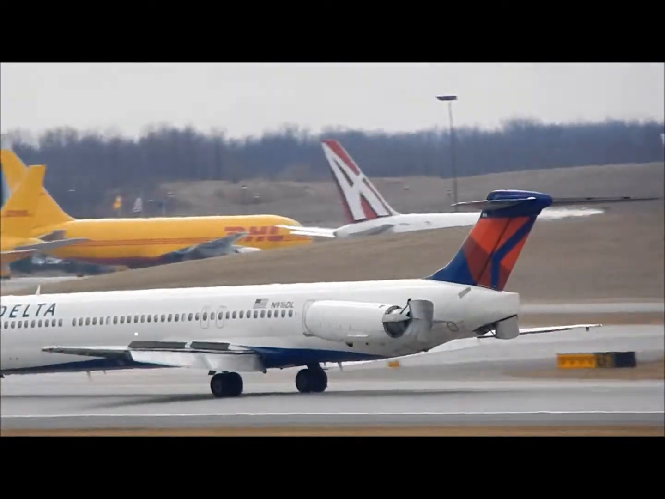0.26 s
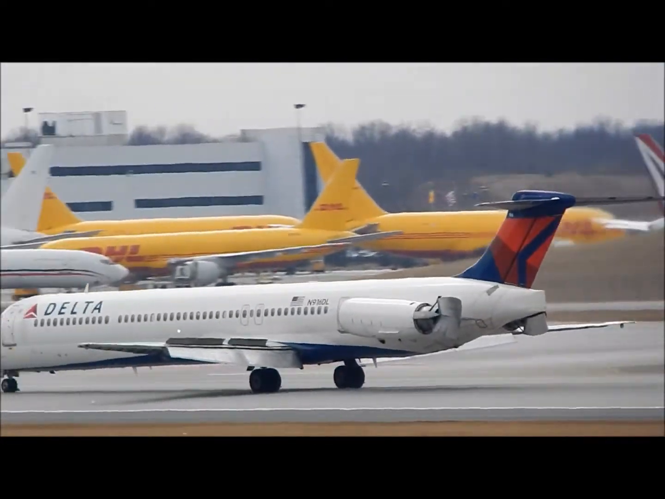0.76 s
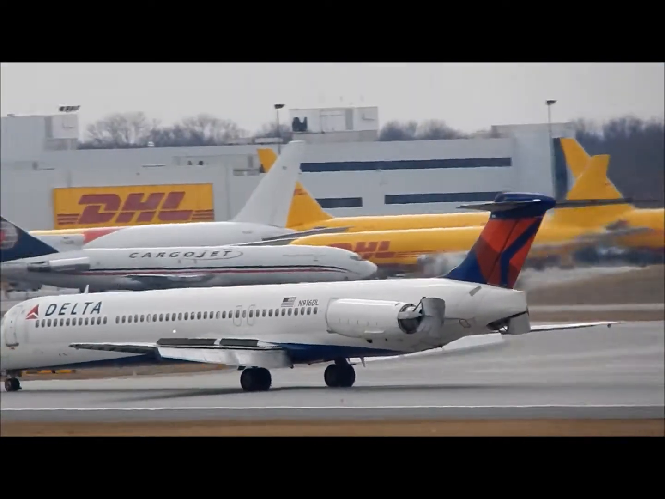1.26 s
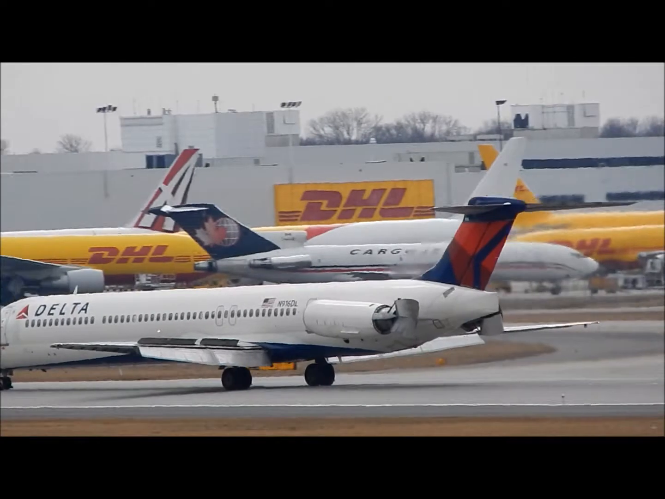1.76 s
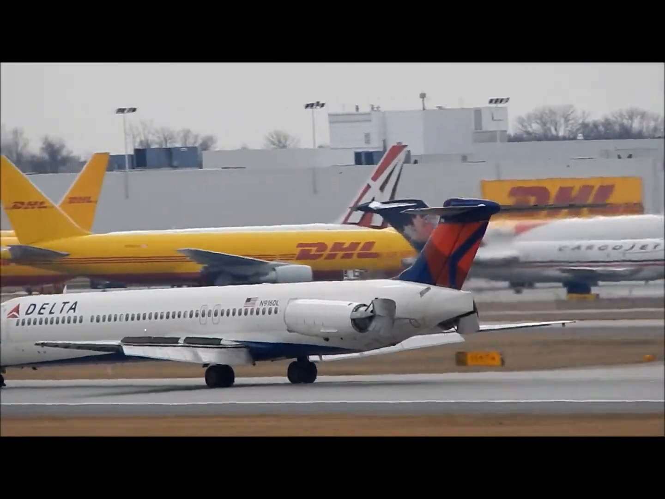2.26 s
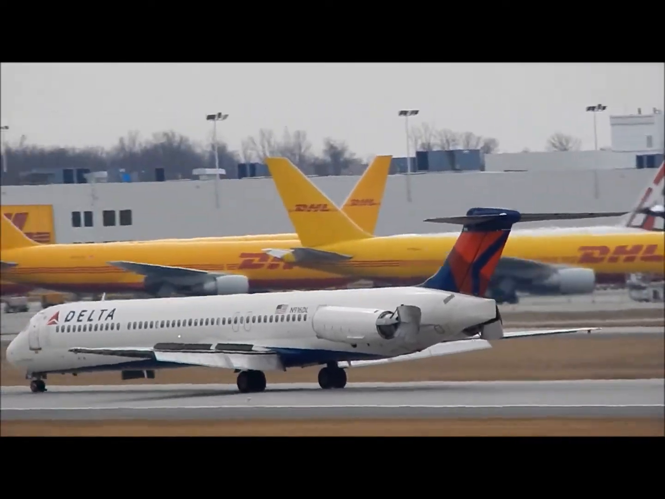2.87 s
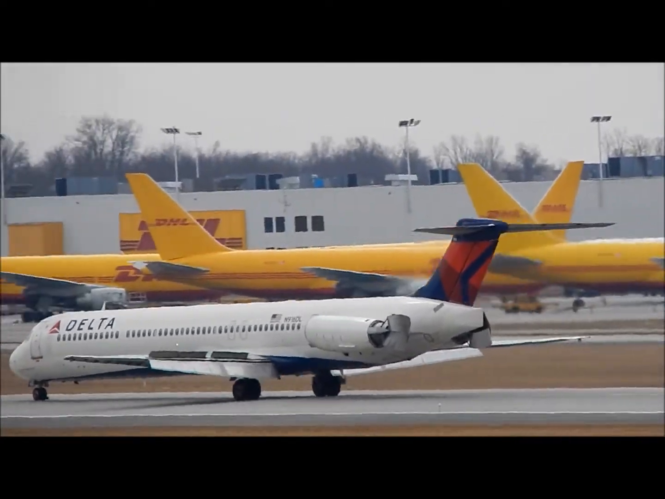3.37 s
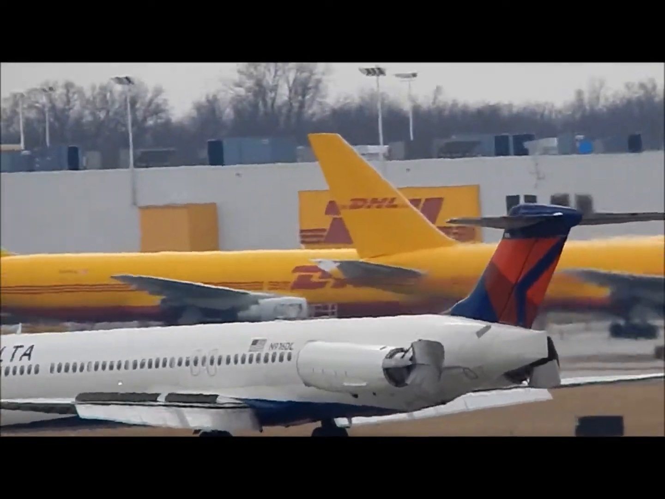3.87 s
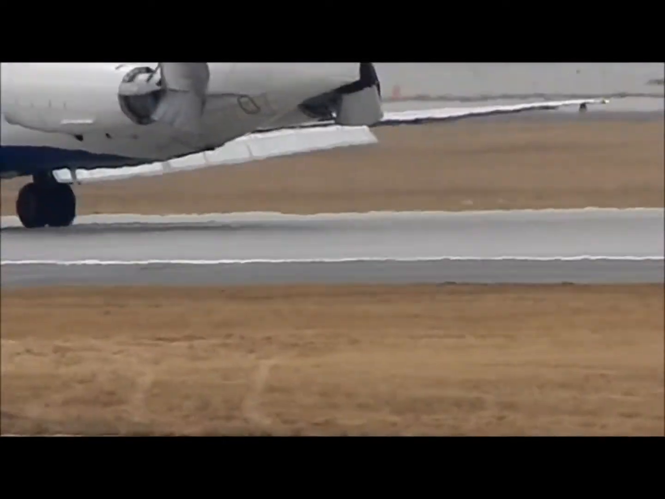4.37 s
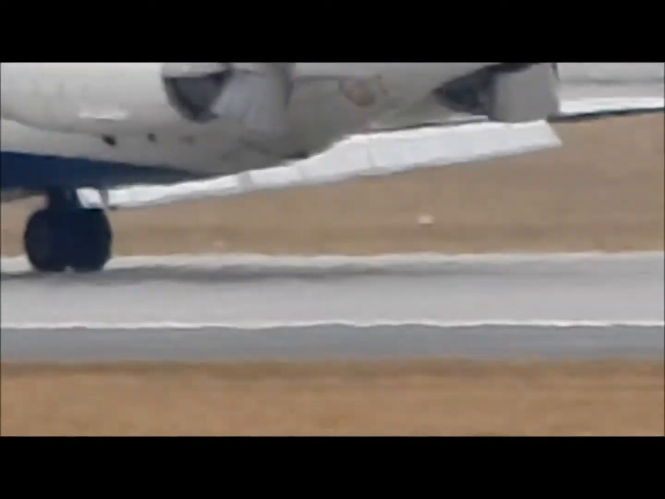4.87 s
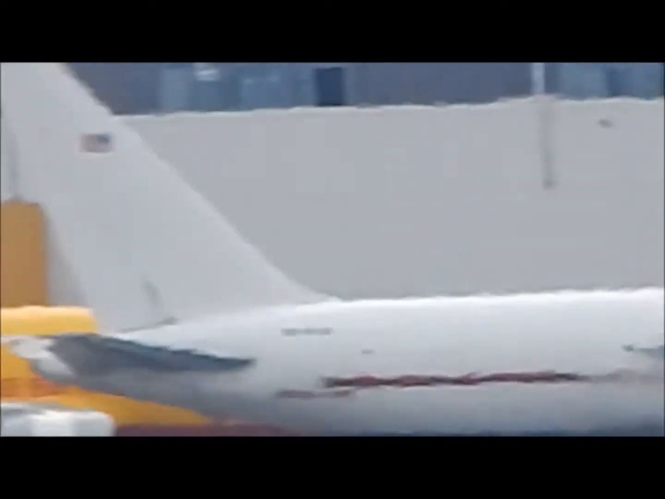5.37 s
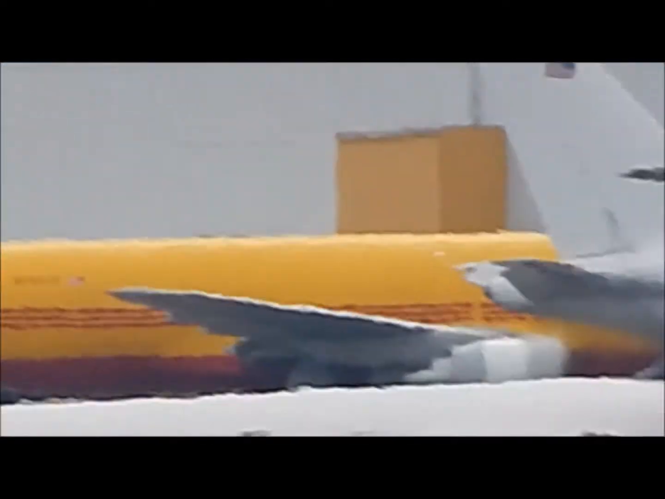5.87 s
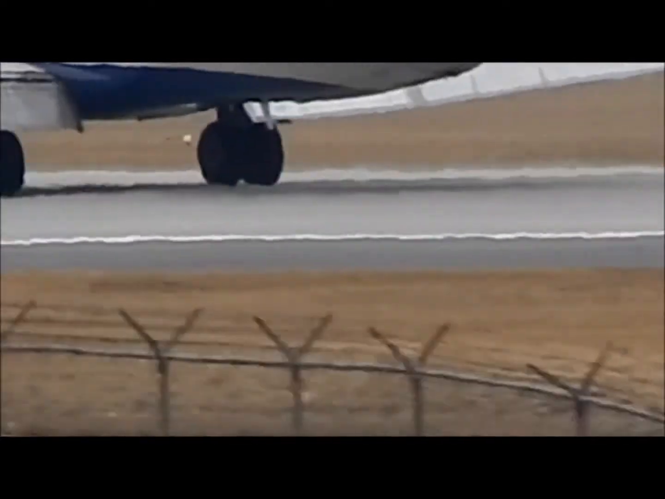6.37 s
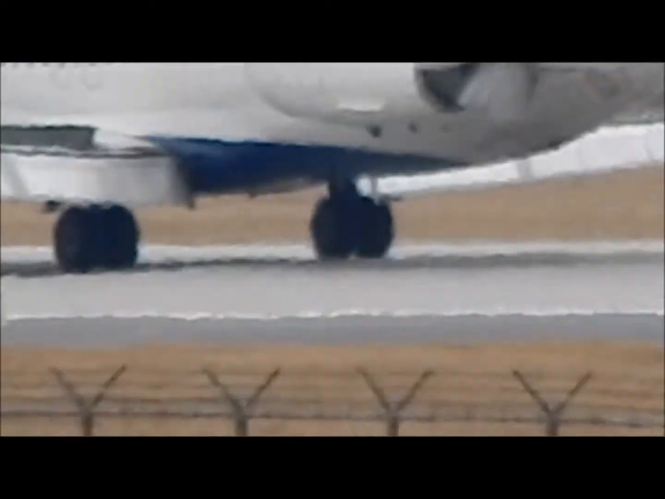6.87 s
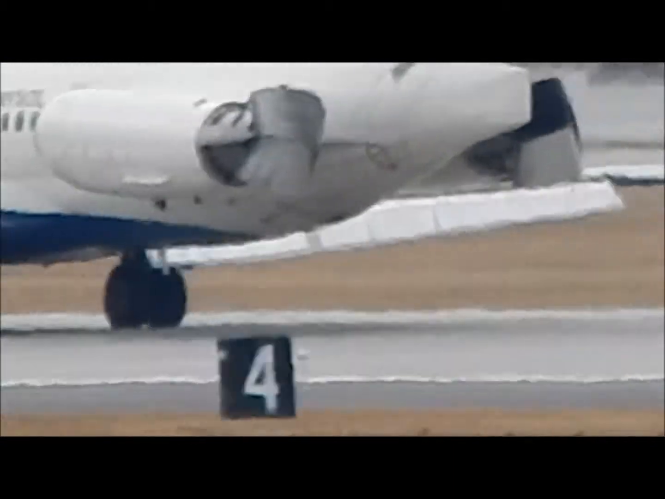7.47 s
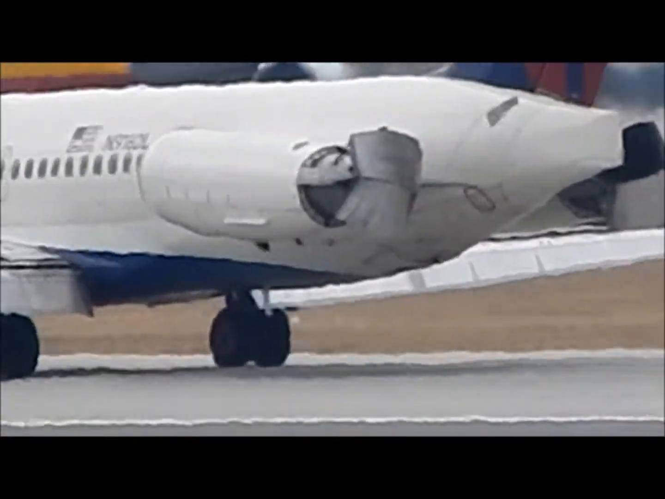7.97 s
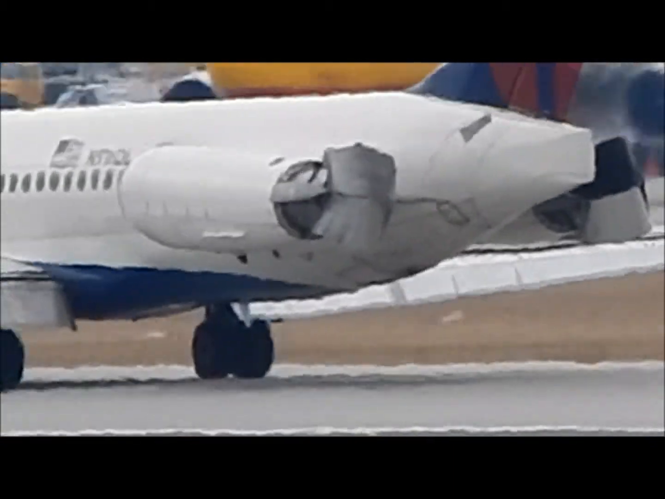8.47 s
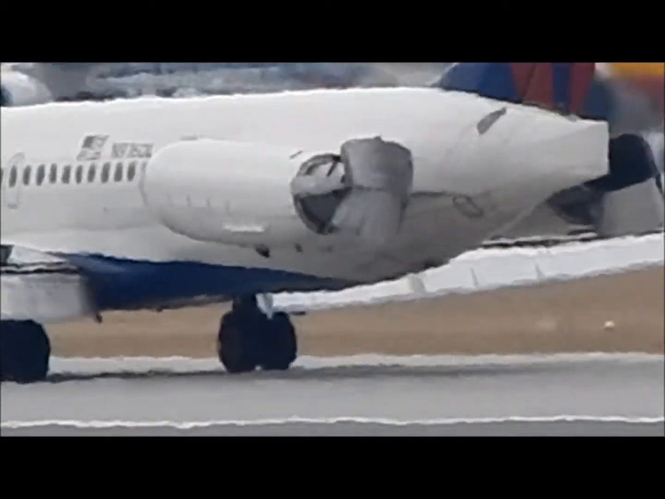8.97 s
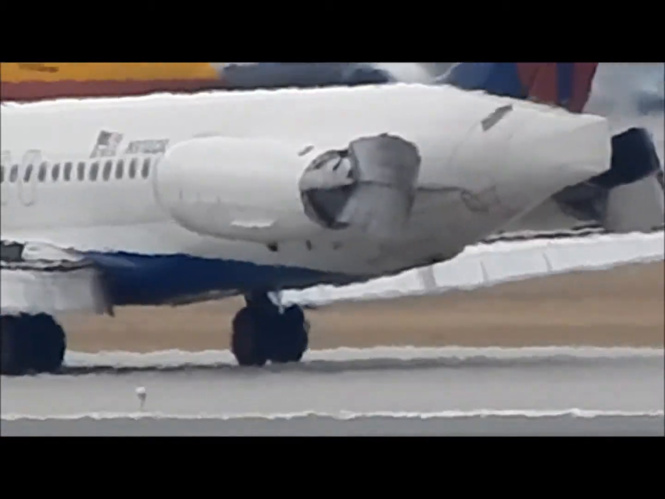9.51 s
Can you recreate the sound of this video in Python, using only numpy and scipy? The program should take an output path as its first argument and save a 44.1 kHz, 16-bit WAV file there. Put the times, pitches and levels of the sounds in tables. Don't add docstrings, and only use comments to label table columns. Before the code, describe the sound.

Distant twin jet braking in reverse thrust, a dull hollow roar, with wind booming on the microphone and fingers ticking on its casing.

```python
import sys
import numpy as np
from scipy import signal
from scipy.fft import rfft, irfft, next_fast_len
from scipy.io import wavfile
from scipy.ndimage import uniform_filter1d, map_coordinates

SR = 44100
rng = np.random.default_rng(int(sys.argv[2]) if len(sys.argv) > 2 else 0)


def gain_from_db(level_db):
    decades = np.asarray(level_db, float) / 20
    return 10 ** decades


def unload_wav(signal):
    wavfile.write(
        sys.argv[1],
        SR,
        np.round(np.clip(np.atleast_2d(signal).T, -1, 1) * 32767).astype(np.int16),
    )


N = 429521


def unit(x):
    return x / np.sqrt(np.mean(x ** 2) + 1e-20)


def along(points, hz):
    f, v = np.transpose(points)
    return np.interp(np.log(hz + 1), np.log(f + 1), v)


def curves(rows, t=None):
    s, *columns = np.transpose(rows)
    t = np.arange(N) / SR if t is None else t
    return [np.interp(t, s, column) for column in columns]


def wobble(knots_per_s):
    return map_coordinates(rng.standard_normal(1000), [np.arange(N) * knots_per_s / SR])


def filtered(x, response):
    m = next_fast_len(N + 8192)
    hz = np.fft.rfftfreq(m, 1 / SR)
    return irfft(rfft(x, m) * response(hz), m)[..., :N]


def band(x, low_hz, high_hz):
    return signal.lfilter(*signal.butter(2, [low_hz, high_hz], "bandpass", fs=SR), x)


def rush(spectrum, alike, patchy_db, moving_db=lambda hz, t: 0):
    hz, t, z = signal.stft(rng.standard_normal((2, N)), SR, nperseg=1024)
    patches = uniform_filter1d(rng.standard_normal(z.shape[1:]), size=8, axis=0)
    patches = unit(uniform_filter1d(patches, size=7, axis=1))
    z = z * gain_from_db(patchy_db * patches + along(spectrum, hz)[:, None])
    turn = np.arccos(np.clip(along(alike, hz), -1, 1))[:, None] / 2
    mid, side = z * [np.cos(turn), np.sin(turn)]
    pair = np.array([mid + side, mid - side])
    return signal.istft(pair * gain_from_db(moving_db(hz[:, None], t)), SR, nperseg=1024)[1][:, :N]


def panned(x, db):
    return x * gain_from_db(np.reshape([db / 2, -db / 2], (2, -1)))


# frequency in Hz, density in dB per Hz.
HISS_SPECTRUM = [(1500, -18.5), (3000, -1.5), (4000, -2.5), (5000, -6), (7000, -9.5), (10500, -8.5),
                 (13000, -11), (15800, -15.5)]
# start in seconds, frequency in Hz, level in dB.
LENS_MOTOR = (5.2, 11250, -83.5)


def hiss():
    t = np.arange(N) / SR
    start, hz, motor_db = LENS_MOTOR
    tone = (t > start) * np.sin(2 * np.pi * hz * t)
    whine = [[.2], [1]] * gain_from_db(motor_db + 3 * wobble(4)) * tone
    return gain_from_db(-62.5) * unit(rush(HISS_SPECTRUM, [(5000, 0.089)], .6)) + whine


# start in seconds, length in seconds, frequency in Hz, level in dB.
CREAKS = [
    (7.04, .11, 5000, -65),
    (7.042, 0.15, 8300, -65),
    (7.253, 0.033, 4000, -58),
    (8.1, .05, 11300, -65),
]


def creaks():
    out = np.zeros((2, N))
    for s, length, hz, db in CREAKS:
        size = round(length * SR)
        noise = band(rng.standard_normal((2, size)), .93 * hz, 1.07 * hz)
        out[:, round(s * SR):][:, :size] += gain_from_db(db) * np.hanning(size) ** .5 * unit(noise)
    return out


# peak time in seconds, rise in seconds, peak level in dB,
# left-right difference in dB, dull part relative to the bright in dB.
STROKES = [(.23, 0.035, -65, -0.5, -3), (.48, .15, -70, 3, -3.5), (.91, 0.18, -65, 8.5, -4.5),
           (1.25, .15, -63.5, 4, -7.5), (1.61, 0.066, -62, 7.5, -8.5), (1.8, 0.91, -67.5, 4.5, -2.5),
           (2.78, 0.25, -63, -2, -6.5), (3.03, .25, -63.5, -1, -4), (3.2, .04, -54.5, -2, 1.5),
           (3.55, 0.065, -69.5, 6.5, -3), (3.87, .3, -67, 8, 0), (4.42, 0.2, -67.5, 5, 1.5),
           (4.71, .12, -59, 5.5, 0.5), (5.14, 0.016, -59.5, 3, -10), (5.4, .2, -68.5, 6.5, -2.5),
           (5.85, .7, -71, 2.5, -9.5), (6.41, 0.036, -70, -3, 1.5), (6.54, 0.13, -67.5, 8.5, -11),
           (7.29, .25, -64.5, 4.5, -1), (7.67, 0.17, -68.5, 7, -8), (7.8, 0.072, -54, 6.5, -3.5),
           (8.1, 0.71, -67.5, 8.5, -2), (9.35, .05, -68.5, -3, -5), (9.49, 0.074, -65, 2.5, -2)]
# frequency in Hz, density in dB per Hz.
SKIN_SPECTRUM = [(5500, -30), (7000, -6), (8500, -5), (11000, -3), (13500, -6), (15800, -13)]
# frequency in Hz, density in dB per Hz.
CLOTH_SPECTRUM = [(2500, -28.5), (4000, 0), (5000, -7), (6500, -6.5), (8000, -25.5), (9000, -59.5)]


def rub():
    s, rise, db, pan, dull_db = np.transpose(STROKES)[:, :, None]
    rise_db, release_ratio, rest_db = 10.5, 0.65, -83.5
    t = np.arange(N // 128 + 1) * 128 / SR
    stroke_db = db - rise_db * np.maximum((s - t) / rise, (t - s) / (release_ratio * rise))

    def level(relative_db):
        power = [np.sum(gain_from_db(stroke_db + relative_db + side * pan) ** 2, axis=0) + gain_from_db(rest_db) ** 2
                 for side in (.5, -.5)]
        return np.sqrt(power).repeat(128, axis=1)[:, :N]

    slips = np.minimum(rng.exponential(size=N // 128 + 1), 3)
    grains = gain_from_db(2.2 * slips).repeat(128)[:N]
    skin = level(2.0) * unit(grains * rush(SKIN_SPECTRUM, [(5000, 0.23)], 2.7))
    cloth = level(dull_db + 0.5) * unit(grains * rush(CLOTH_SPECTRUM, [(5000, .6)], 4.0))
    return skin + cloth


def crackle():
    faint_db, spread_db, bright_db = -59, 2.5, -1
    snaps = []
    for (s, rise, _, pan, _), (a, b, c) in zip(STROKES, rng.standard_normal((len(STROKES), 3))):
        snaps.append((s + .5 * rise * a, faint_db + spread_db * b, pan, faint_db + bright_db + spread_db * c))
    return snaps


# time in seconds, dull peak in dB, left-right difference in dB, bright peak in dB.
TICKS = [(0.2234, -40, -8.5, -54.5), (0.3945, -50, -0.5, -71), (0.4693, -44, -7, -57),
         (0.8894, -40, -1, -46.5), (1.0498, -46.5, -9, -62), (1.333, -39, -1.5, -54.5),
         (1.5904, -49.5, 5.5, -50.5), (1.8982, -52.5, 9, -52), (2.3147, -39, 6.5, -65.5),
         (3.1948, -41, -9, -52), (3.2037, -53, -0.5, -55), (3.2214, -50, 2, -54), (3.3548, -41.5, 1, -61.5),
         (3.712, -43, -4, -55.5), (3.883, -57.5, 4, -55.5), (4.0474, -43.5, 2.5, -53),
         (4.4167, -39.5, 1, -58.5), (4.6163, -45, 3.5, -61), (4.6693, -55.5, 0, -45),
         (4.7118, -40.5, 8.5, -49.5), (4.7835, -22.5, -5.5, -35), (4.7883, -25.5, -4, -28),
         (6.4108, -43, -5, -64), (7.2946, -41, 4, -66), (7.7672, -53, -3, -55), (7.7974, -47, 4, -42.5),
         (7.882, -56, 3, -51), (9.5272, -50, -6, -71), (9.5935, -51.5, -2, -70), (9.654, -45, -10.5, -62.5)]
# frequency in Hz, level in dB, decay by 60 dB in seconds.
SHELL_MODES = [(2070, -1, .03), (3240, -3, 0.019), (7200, -8, 0.015), (9200, -8.5, .01)]


def fingers():
    out, t = np.zeros((2, N + SR)), np.arange(SR // 10) / SR
    for s, dull_db, pan, bright_db in TICKS + crackle():
        snap = (t == 0) + 0.21 * gain_from_db(-60 * t / 0.002) * rng.standard_normal((2, len(t)))
        dull = gain_from_db(dull_db + 16.5) * band(snap, 1200, 7500)
        bright = gain_from_db(bright_db + 25.0) * band(band(snap, 7000, 11000), 5400, 13500)
        ring = 0
        for hz, level_db, t60 in SHELL_MODES:
            ring = ring + gain_from_db(level_db + rng.normal(0, 3) - 60 * t / t60) * np.sin(2 * np.pi * hz * t)
        tick = dull + bright + gain_from_db(dull_db - 19.0) * ring
        out[:, round((s + .001) * SR):][:, :len(t)] += panned(tick, pan)
    return out[:, :N]


# time in seconds, level in dB.
SCRAPE_LEVEL = [
    (4.758, -92),
    (4.765, -41),
    (4.78, -32),
    (4.787, -24),
    (4.794, -36),
    (4.81, -39),
    (4.82, -49.5),
    (4.826, -68.5),
    (4.84, -110),
]
# frequency in Hz, density in dB per Hz.
SCRAPE_SPECTRUM = [(1000, -25), (2500, 3.5), (4000, -1), (6000, -8), (7200, 0), (9300, -4.5), (12000, -6),
                   (13800, -10.5), (14200, -20.5), (15800, -20)]


def knock():
    scrape = gain_from_db(curves(SCRAPE_LEVEL)[0]) * unit(rush(SCRAPE_SPECTRUM, [(3000, 0.3), (9000, -0.3)], 1.4))
    t = np.clip(np.arange(N) / SR - 4.788, 0, None)
    ring = gain_from_db(-8.0 - 60 * t / 0.012) * np.sin(2 * np.pi * 2100 * t)
    return panned(scrape, -8.5) + panned(ring, -9)


# start in seconds, length in seconds, buffet level in dB.
GUSTS = [(0.0, 0.12, -18), (.2, 0.081, -16), (0.374, 0.25, -19.5), (.69, 0.04, -14.5),
         (0.785, 0.032, -16.5), (0.852, 0.15, -16.5), (1.304, 0.088, -21), (1.438, .2, -15.5),
         (1.752, 0.68, -16), (2.482, .1, -20.5), (2.84, 0.078, -17.5), (3, 0.19, -18.5),
         (3.264, 0.18, -16.5), (3.467, 0.092, -13.5), (3.588, 0.05, -17.5), (3.685, 0.27, -13.5),
         (3.94, .19, -17), (4.141, 0.32, -14), (4.482, 0.28, -16.5), (4.79, 0.33, -14.5),
         (5.17, 0.054, -11.5), (5.279, 0.44, -17.5), (5.758, 0.74, -17), (6.551, 0.35, -21),
         (6.95, .12, -19), (7.17, .44, -17.5), (7.695, .79, -20), (8.56, 0.039, -22), (8.972, 0.049, -23.5),
         (9.09, 0.024, -18.5)]
# frequency in Hz, density in dB per Hz.
BUFFET_SPECTRUM = [(12, -57), (20, -27), (43, -18.5), (76, -3.5), (97, 2), (127, -3), (227, -33),
                   (270, -37.5), (350, -56), (590, -120)]
# frequency in Hz, left-right likeness from 0 to 1.
BUFFET_ALIKE = [(35, .45), (70, .94), (250, .92)]


def wind():
    swell_db_per_s = 1.5
    lulls_per_s, lull_below, lull_db = 30, -1.0, -15
    noise = unit(filtered(rush([(20, 0)], BUFFET_ALIKE, 0), lambda hz: gain_from_db(along(BUFFET_SPECTRUM, hz))))
    power = np.abs(uniform_filter1d(np.mean(noise ** 2, axis=0), size=2000))
    lumpy = gain_from_db(1.1 * wobble(25)) * noise / (0.34 + power ** 0.15)
    lumpy = lumpy * gain_from_db(lull_db * np.clip(3 * (lull_below - wobble(lulls_per_s)), 0, 1))
    gate = np.zeros(N)
    for s, length, db in GUSTS:
        span = slice(max(round(s * SR), 0), round((s + length) * SR))
        crown = np.sin(np.linspace(0, np.pi, span.stop - span.start))
        gate[span] = gain_from_db(db + 1.5 + swell_db_per_s * length * (crown - 0.73)) / np.std(lumpy[:, span])
    gate = signal.fftconvolve(gate, np.hanning(500) / 250, "same")
    return filtered(gate * lumpy, lambda hz: hz ** 2 / (hz ** 2 + 30 ** 2))


# frequency in Hz, density in dB per Hz.
RUMBLE_SPECTRUM = [(15, -64.5), (40, -25.5), (80, -2), (115, 3), (160, -10.5), (220, -13.5), (300, -32),
                   (400, -77.5)]


def rumble():
    return gain_from_db(curves(JET_LEVEL)[0] - 10 + wobble(5.2)) * unit(rush(RUMBLE_SPECTRUM, [(100, .92)], 1.8))


# time in seconds, body level in dB, brightness of the upper humps in dB.
JET_LEVEL = [(0.0, -20, -0.5), (0.55, -20.5, 1), (1.35, -23, 7.5), (1.8, -21, 1), (2.4, -21, -1.5),
             (3.0, -18, -2), (3.3, -23.5, 0), (3.7, -22.5, -3), (4.5, -25, 1.5), (5.2, -20, -4.5),
             (6.1, -23.5, 3.5), (6.65, -21.5, -1.5), (7.1, -24.5, 4.5), (7.6, -22, -3.5), (8.3, -23, 2.5),
             (8.6, -26, -0.5), (9.4, -28, -2.5), (9.74, -36, 2.5)]
# frequency in Hz, density in dB per Hz.
ROAR_SPECTRUM = [(150, -38), (255, -36), (290, -21), (355, -2.5), (423, 1), (760, -3.5), (1050, -13.5),
                 (1380, -7.5), (1850, -19.5), (2280, -20), (2780, -33.5), (3400, -39.5), (3800, -51),
                 (7000, -79)]
ROAR_BANDS_HZ = [320, 440, 760, 1350, 2300, 3300]
BRIGHT_SHARE = [-0.7, 0.16, 1.16, 0.45, 0.7, .65]
AIR_LOSS_DB_PER_S = [.1, -0.1, -0.1, -0.13, 0.54, 0.99]
# time in seconds, frequency in Hz.
GROUND_DIP = [(0, 1063), (2, 1090), (3.2, 1037), (4.5, 1026), (6, 1044), (7.5, 1000), (8.5, 930),
              (9.74, 977)]
# frequency in Hz, left-right likeness from 0 to 1.
ROAR_ALIKE = [(280, 0.97), (610, 1), (1310, 0.98), (2830, 0.9)]
# frequency in Hz, left-right difference in dB.
ROAR_BALANCE = [(130, 0.5), (280, 1.4), (610, 0), (1310, .5), (2830, -1.5)]


def jet():
    def colour(hz, t):
        place = np.interp(np.log(hz + 1), np.log(ROAR_BANDS_HZ), np.arange(6))
        bright_db = curves(JET_LEVEL, t)[1]
        tilt = 0
        for k in range(6):
            band_db = BRIGHT_SHARE[k] * bright_db - AIR_LOSS_DB_PER_S[k] * (t - t.mean())
            tilt = tilt + np.clip(1 - abs(place - k), 0, 1) * band_db
        reach = np.interp(hz, [600, 850, 1900, 2300], [0, 1, 1, 0])
        moved_hz = hz * (1 + reach * (1050 / curves(GROUND_DIP, t)[0] - 1))
        return tilt + along(ROAR_SPECTRUM, moved_hz) - along(ROAR_SPECTRUM, hz)

    roar = rush(ROAR_SPECTRUM, ROAR_ALIKE, 1.24, colour)
    roar = roar / np.std(filtered(roar, lambda hz: (hz > 330) & (hz < 580)))
    side = np.array([[.5], [-.5]])
    lag = 2 / SR

    def ports(hz):
        return gain_from_db(along(ROAR_BALANCE, hz) * side) * np.exp(-2j * np.pi * hz * lag * side)

    return gain_from_db(curves(JET_LEVEL)[0] - 0.03 + 0.48 * wobble(9)) * filtered(roar, ports)


# time in seconds, depth in dB.
DUCKS = [
    (4.425, 2),
    (4.788, 13),
    (6.415, 1.5),
    (9.66, 1),
]


def duck(share, hold, db_per_s):
    t = np.arange(N) / SR
    lost_db = 0
    for s, db in DUCKS:
        attack = np.clip((t - s) / .02, 0, 1)
        recovered_db = db_per_s * np.clip(t - s - hold, 0, None)
        lost_db = lost_db + attack * np.clip(share * db - recovered_db, 0, None)
    return gain_from_db(-lost_db)


def scene():
    faint = duck(share=2.6, hold=.1, db_per_s=110) * (hiss() + rub())
    handling = creaks() + fingers() + knock()
    loud = duck(share=0.91, hold=0.14, db_per_s=21.3) * (wind() + rumble() + jet())
    return faint + handling + loud


def low_pass(x):
    return signal.sosfilt(signal.butter(12, 15830, fs=SR, output="sos"), x)


# frequency in Hz, width in Hz, depth from 0 to 1.
PORT_DIPS = [(2505, 45, .93), (3700, 45, .6), (7520, 50, .8)]


def record(dry):
    def dips(hz):
        return np.prod([1 - depth * np.exp(-((hz - c) / width) ** 2) for c, width, depth in PORT_DIPS], axis=0)

    x = filtered(dry, dips)
    x = x / (1 + np.abs(x / .95) ** 6) ** (1 / 6)
    return low_pass(x)


dry = scene()
out = record(dry)
unload_wav(out)
```